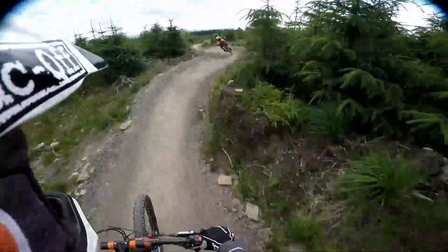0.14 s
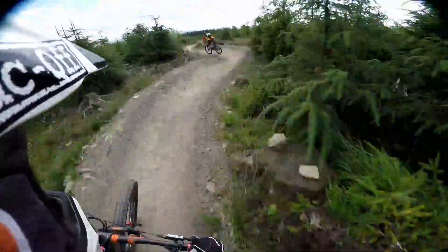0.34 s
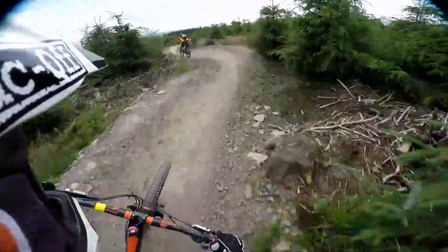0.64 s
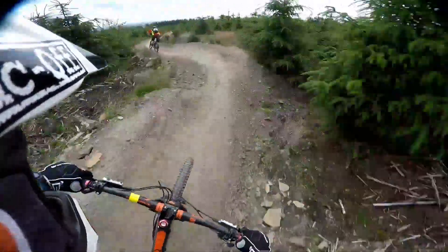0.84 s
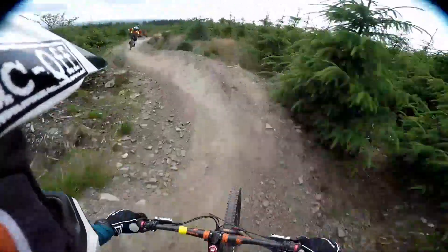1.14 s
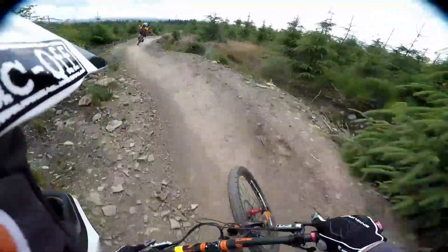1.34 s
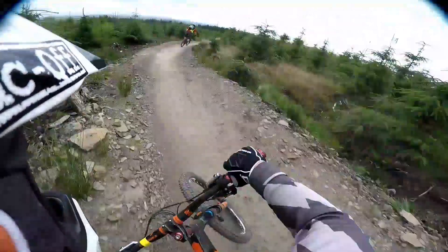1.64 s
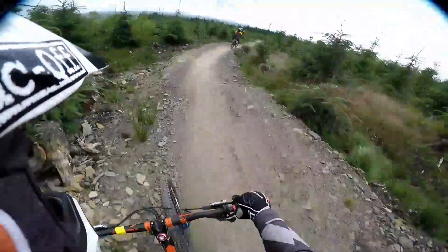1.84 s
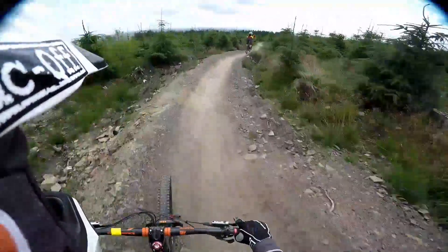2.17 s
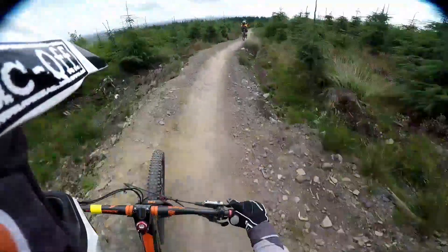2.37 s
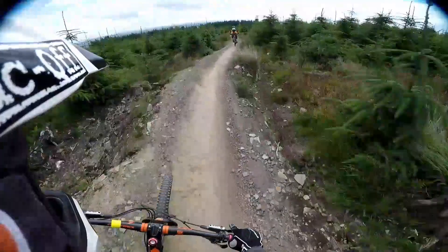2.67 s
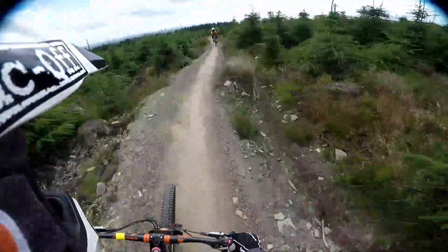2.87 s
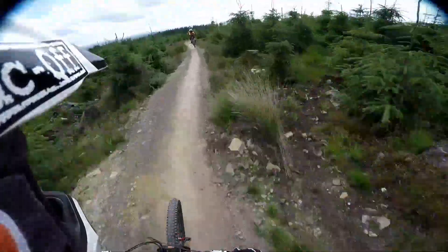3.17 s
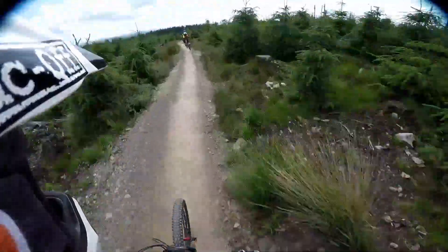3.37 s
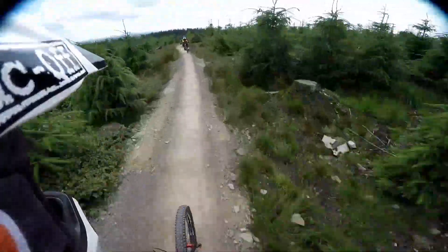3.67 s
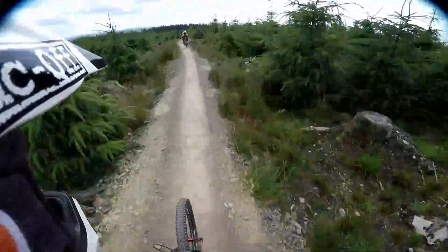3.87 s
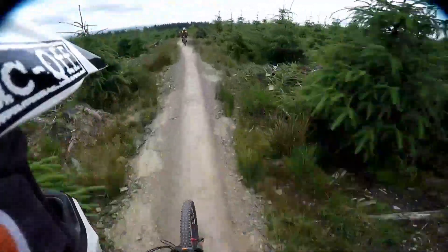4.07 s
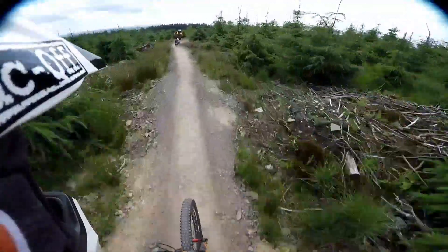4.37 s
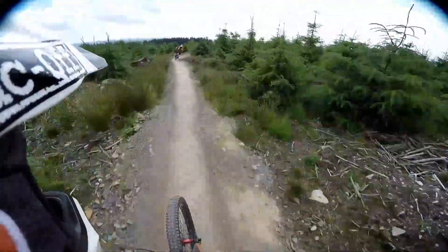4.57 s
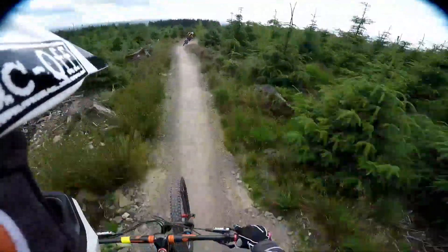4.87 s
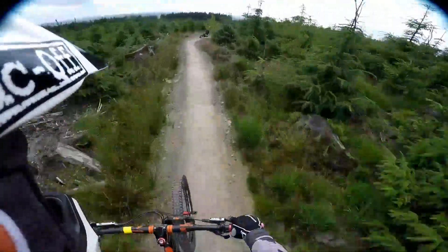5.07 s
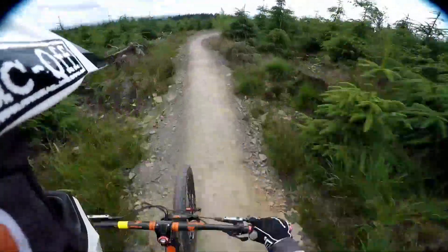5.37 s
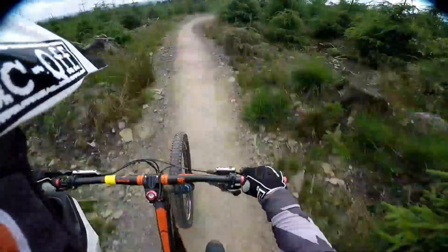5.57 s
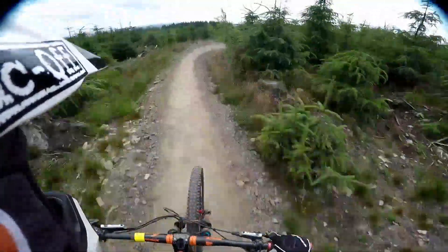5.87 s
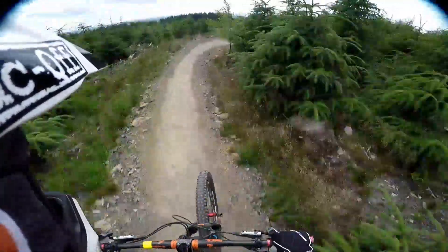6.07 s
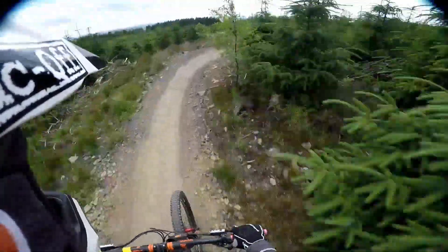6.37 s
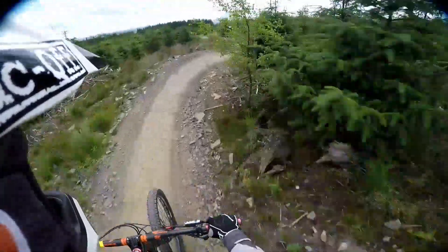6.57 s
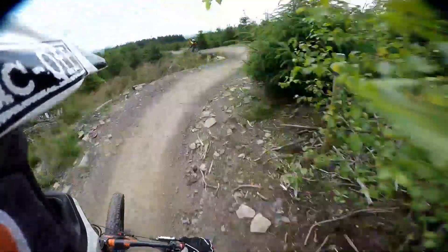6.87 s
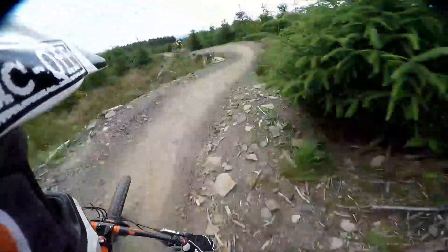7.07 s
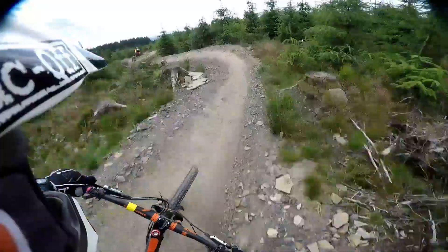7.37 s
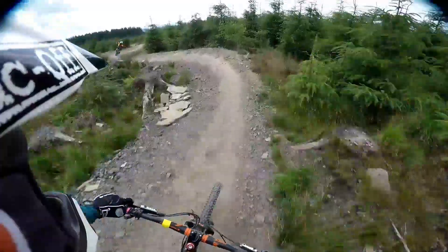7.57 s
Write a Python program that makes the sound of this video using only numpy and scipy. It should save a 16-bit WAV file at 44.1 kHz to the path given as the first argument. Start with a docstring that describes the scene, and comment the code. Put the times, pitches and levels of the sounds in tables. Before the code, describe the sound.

Wind buffets a helmet microphone as a mountain bike crunches fast down loose gravel, with stones pinging and rattling off the frame.

```python
"""A bicycle runs down a loose gravel trail, heard from a cased microphone on the rider's helmet.
Tyres: shared cracks and pitched grains in noise bands, and a hollow noise hum. Low thuds sag in pitch.
Stones ring decaying frame modes and rattle on; grit ticks as short noise bursts.
Wind on the case: shaped noise pushes and lumpy rush, thumps, one brightening gust, thin wandering howls."""
import sys
import numpy as np
from scipy import signal
from scipy.fft import rfft, irfft, next_fast_len
from scipy.io import wavfile
from scipy.ndimage import uniform_filter1d

SR = 44100
rng = np.random.default_rng(int(sys.argv[2]) if len(sys.argv) > 2 else 0)


def wav_out(sig):
    """Save sig, one row per channel (or a flat mono array), as 16-bit PCM at SR to the path in sys.argv[1]."""
    wavfile.write(sys.argv[1], SR, np.round(np.clip(np.atleast_2d(sig).T, -1, 1) * 32767).astype(np.int16))


N = 340893


def gain_of(db):
    """Decibels to amplitude gain."""
    return 10 ** (np.asarray(db) / 20)


def evened(x):
    """Scales to rms 1."""
    return x / np.sqrt(np.mean(x ** 2) + 1e-20)


def curve(rows, column):
    """One table column interpolated over time, for every sample."""
    rows = np.array(rows)
    return np.interp(np.arange(N) / SR, rows[:, 0], rows[:, column])


def add(mix, start_s, sound):
    """Mixes a sound in at a time, cut at the end of the mix."""
    part = mix[round(start_s * SR):][:len(sound)]
    part += sound[:len(part)]


def coloured(x, spectrum):
    """Filters a flat signal to a spectrum table, linear in dB over log frequency, at rms 1."""
    hz, db = np.transpose(spectrum)
    size = next_fast_len(len(x))
    log_bins = np.log(np.fft.rfftfreq(size, 1 / SR) + 1)
    bin_db = np.interp(log_bins, np.log(hz + 1), db, -120, -120)
    return evened(irfft(rfft(x, size) * gain_of(bin_db), size)[:len(x)])


def flutter(per_s):
    """Low-passed noise of rms 1 that changes about per_s times a second."""
    lowpass = signal.butter(2, per_s, fs=SR, output="sos")
    return evened(signal.sosfilt(lowpass, rng.standard_normal(N)))


def grain_gains(spread_db):
    """Random grain sizes: most small, a few large."""
    return gain_of(spread_db * np.minimum(rng.exponential(1, N), 4))


def grains(per_s, spread_db):
    """Sparse clicks of random sign and size, at rms 1."""
    sizes = grain_gains(spread_db)
    signs = rng.choice([-1., 1.], N)
    return evened(sizes * signs * (rng.random(N) < per_s / SR))


def stones(low_hz, high_hz, per_s, spread_db, cycles, count=16):
    """Shifting stones as decaying sines at random times; each falls 20 dB in the given cycles."""
    hits = grain_gains(spread_db) * (rng.random(N) < per_s / SR)
    kind = rng.integers(0, count, N)
    t = np.arange(1024) / SR
    out = np.zeros(N)
    for k, hz in enumerate(np.geomspace(low_hz, high_hz, count)):
        shape = np.sin(2 * np.pi * hz * t) * gain_of(-20 * hz * t / cycles)
        out += signal.oaconvolve(hits * (kind == k), shape)[:N]
    return evened(out)


# Tyres on packed ground. Each row: time in seconds, crunch, hiss and top-of-hiss base levels in dB.
PACKED_GROUND = [(0.05, -48, -58, -65), (0.2, -52, -59, -63.5), (0.6, -46.5, -54.5, -59.5),
                 (1.05, -47, -55, -59), (1.85, -48, -54, -57.5), (2.5, -49.5, -57, -61.5),
                 (2.9, -50, -58.5, -60.5), (3.5, -48.5, -56, -60), (4.3, -50, -58.5, -61),
                 (4.9, -54.5, -56, -62), (5.3, -56, -58.5, -61.5), (5.6, -49.5, -58.5, -62.5),
                 (6.15, -49.5, -56.5, -60.5), (6.9, -48, -54, -55.5), (7.69, -46.5, -54.5, -57)]
# Loose gravel. Each row: start in seconds, length in seconds, added crunch, hiss and top-of-hiss in dB,
# before the soft edges.
LOOSE_PATCHES = [(0.42, 0.1, 2, 2, 2.5), (0.6, 0.28, 2.5, 3, 4), (1.153, 0.25, 5.5, 0, -1.5),
                 (1.412, 0.29, 6, 2, 3.5), (2.017, 0.22, 3.5, 1.5, 0.5), (2.18, 0.3, 7.5, 4.5, 4),
                 (2.563, 0.097, 10, 1, 2), (3.667, 0.43, 1, -0.5, -1), (4.584, 0.26, 11.5, -0.5, 2.5),
                 (6.24, 0.52, 3, 0, -0.5), (6.995, .2, 3, 1, 2.5)]
PATCH_EDGE_S = 0.053


def ground_db(column):
    """Base level of one tyre layer: packed ground plus loose patches with tanh edges."""
    t, db = np.arange(N) / SR, curve(PACKED_GROUND, column)
    for start_s, length_s, *added_db in LOOSE_PATCHES:
        rise = np.tanh((t - start_s) / PATCH_EDGE_S)
        fall = np.tanh((t - start_s - length_s) / PATCH_EDGE_S)
        db = db + added_db[column - 1] * (rise - fall) / 2
    return db


# Tyre spectra: roar, case resonance, hiss, top of the hiss.
# Each row: frequency in Hz, relative density in dB per Hz.
ROAR_SPECTRUM = [(400, -39), (680, -4), (824, -6), (900, -0.5), (1280, 0), (1830, -3.5), (2200, -6.5),
                 (2860, -28), (4840, -120)]
CASE_SPECTRUM = [(1210, -45), (2050, -7), (2450, 0.5), (2760, 2.5), (3050, -3.5), (3500, -12), (4550, -16),
                 (7700, -120)]
HISS_SPECTRUM = [(1940, -9), (3300, -2), (4050, -0.5), (4880, 0.5), (6310, -2), (7310, -1.5), (9500, -27)]
HISS_TOP_SPECTRUM = [(6000, -24), (8000, -6), (12500, -9), (13900, -10), (15300, -13.5)]
CASE_DB, CASE_FOLLOWS, USUAL_CRUNCH_DB = -49, 0.79, -45  # CASE_DB holds at the usual crunch
LOW_STONE_CYCLES, HIGH_STONE_CYCLES = 2.9, 8
CRACKS_IN_ROAR, CRACKS_IN_CASE, CRACKS_IN_HISS = 0.29, 0.43, 0.27


def tyres():
    """Stones pop and crack inside smooth noise; all bands share the same bumps and cracks."""
    bumps, cracks = flutter(33.0), grains(320.0, 7.5)
    crunch_db = ground_db(1)
    case_db = CASE_DB + CASE_FOLLOWS * (crunch_db - USUAL_CRUNCH_DB)
    low_pops = stones(604.0, 2480.0, 600., 3.3, LOW_STONE_CYCLES) + CRACKS_IN_ROAR * cracks
    high_pops = stones(2230.0, 3460.0, 600., 3.3, HIGH_STONE_CYCLES) + CRACKS_IN_CASE * cracks
    # spectrum, base dB, pops, share of pops, bump depth dB
    layers = [(ROAR_SPECTRUM, crunch_db, low_pops, .65, 1.2),
              (CASE_SPECTRUM, case_db, high_pops, .55, 1.1),
              (HISS_SPECTRUM, ground_db(2), cracks, CRACKS_IN_HISS, .8),
              (HISS_TOP_SPECTRUM, ground_db(3), cracks, CRACKS_IN_HISS, .7)]
    out = np.zeros(N)
    for spectrum, db, pops, share, bump_db in layers:
        smooth = np.sqrt(1 - share ** 2) * coloured(rng.standard_normal(N), spectrum)
        rough = share * coloured(pops, spectrum)
        out += gain_of(db + bump_db * bumps) * (smooth + rough)
    return out


# Hollow hum of the tyres. Each row: time in seconds, level in dB.
HUM_LEVEL = [(0.1, -60), (0.25, -39.5), (0.6, -48), (0.77, -28.5), (0.9, -40), (1.02, -32.5), (1.28, -37),
             (1.45, -37), (1.65, -33), (1.95, -44), (2.4, -38), (2.6, -54), (3.3, -37), (3.6, -58)]
# Hum resonance. Each row: frequency in Hz, relative density in dB per Hz.
HUM_SPECTRUM = [(180, -50), (232, -4.5), (252, 4.5), (272, -4.5), (340, -36)]


def hum():
    """Noise in one narrow low resonance."""
    return gain_of(curve(HUM_LEVEL, 1)) * coloured(rng.standard_normal(N), HUM_SPECTRUM)


# Stones on the frame. Each row: start in seconds, peak of the first hit in dB, centre of the blow in Hz,
# spread in octaves.
STONE_KNOCKS = [(0.364, -34, 1500, 0.32), (0.4164, -27, 1600, 0.56), (.438, -41, 2180, 0.79),
                (.49, -28.5, 1500, .4), (0.618, -30.5, 2150, 0.18), (0.639, -32, 1200, .6),
                (.724, -36, 2500, 0.35), (.746, -31, 2600, 0.36), (.795, -32, 1200, 0.31),
                (0.85, -24, 1480, 0.64), (0.916, -28, 1170, 0.7), (0.95, -29, 1930, 0.66),
                (0.989, -29, 1700, .6), (1.043, -40, 2300, .4), (1.12, -22.5, 1520, 0.15),
                (1.21, -27, 1830, 0.62), (1.2461, -14, 1450, 0.34), (1.252, -34, 2600, 0.6),
                (1.256, -17, 1660, 0.5), (1.2576, -14, 1880, 0.5), (1.2595, -35, 2800, 0.22),
                (1.2623, -33, 2800, .2), (1.265, -18, 1450, 0.54), (1.275, -37, 2200, .65),
                (1.2915, -27, 1250, 0.4), (1.296, -31, 2500, 0.82), (1.3006, -25, 2190, 0.7),
                (1.309, -33, 2200, 0.65), (1.306, -35, 2700, 0.51), (1.3315, -32, 3580, 0.61),
                (1.332, -22.5, 1150, 0.43), (2.024, -32, 2800, 0.33), (2.033, -27.5, 1500, 0.6),
                (2.066, -32, 1700, .5), (1.398, -29, 1500, .7), (1.526, -34, 2680, 0.24),
                (1.623, -33.5, 2500, 0.091), (1.7, -32.5, 2730, 0.18), (2.075, -27, 1790, 0.96),
                (2.0972, -29.5, 1500, 0.73), (2.116, -31, 2500, .4), (2.124, -33, 1100, 0.54),
                (2.184, -29, 1070, 0.64), (2.197, -26, 1200, 0.62), (2.236, -26.5, 1100, 0.71),
                (2.252, -35, 2600, 0.44), (2.264, -29, 1400, 0.57), (2.273, -33, 2800, .3),
                (2.285, -30, 1500, .5), (2.304, -31, 1000, 0.51), (2.312, -35, 2200, 0.43),
                (2.345, -35, 1400, 0.27), (2.372, -35, 1100, 0.49), (2.395, -26, 1560, 0.73),
                (2.402, -25, 1250, .3), (2.417, -30, 960, 0.35), (2.431, -35, 2400, 0.33),
                (2.449, -30, 1600, .3), (2.457, -31, 1250, 0.31), (2.492, -30, 2230, .4),
                (2.531, -36, 1500, 0.28), (2.551, -29, 1500, 0.5), (2.559, -31, 1700, 0.16),
                (2.634, -34, 1600, .6), (2.658, -26.5, 1690, 0.2), (3.354, -43, 2600, 0.27),
                (3.3612, -37, 1550, 0.38), (3.3612, -24, 540, 0.53), (3.368, -38, 1700, 0.27),
                (3.384, -37, 2700, .4), (3.405, -26, 1550, .4), (4.9665, -44, 2200, .3),
                (4.9681, -21.5, 850, 0.47), (5.068, -38.5, 2600, 0.33), (5.139, -39, 1250, .35),
                (5.141, -31.5, 760, 0.42), (5.344, -30, 1700, 0.77), (5.372, -32, 2800, 0.34),
                (5.394, -23, 1920, .3), (5.457, -32, 2500, .3), (5.478, -29, 1500, .5),
                (5.693, -26.5, 2320, 0.5), (5.787, -27, 2000, 0.51), (6.0124, -30, 1500, 0.42),
                (6.0133, -24.5, 780, 0.41), (6.129, -30, 1550, 0.89), (6.297, -37, 2800, .3),
                (6.304, -32, 2300, 0.18), (6.367, -37, 2600, .3), (6.372, -30, 1920, 0.62),
                (6.377, -27, 2000, 0.51), (6.382, -30, 2400, .6), (6.407, -40, 1900, .5),
                (6.448, -31, 2200, 0.46), (6.455, -33, 2800, 0.33), (6.523, -33, 700, 0.37),
                (6.542, -30, 1300, 0.54), (6.548, -33, 1200, 0.13), (6.575, -27, 1600, .5),
                (6.582, -31, 1300, .3), (6.593, -30, 1700, 0.54), (6.621, -33, 2300, .4),
                (6.642, -27, 1890, 0.46), (6.658, -32, 1200, 0.43), (6.67, -27, 1480, .4),
                (6.705, -35, 1300, .3), (6.765, -32, 1300, 0.36), (6.786, -25, 1490, 0.24),
                (6.789, -27, 1440, .3), (6.809, -39, 2800, .1)]
# Frame modes. Each row: frequency in Hz, relative level in dB, share of the ring time.
FRAME_MODES = [(470, 8, 1.0), (570, 4.5, 1), (625, 10, 1), (780, 1, 0.63), (923, 4.5, 0.71),
               (1170, 6.5, 0.36), (1317, 8.5, 0.29), (1613, 1.5, 0.6), (1822, -1.5, 0.51), (2096, 2, 0.46),
               (2477, 2, 0.53), (2824, 3.5, 0.58), (3114, -3.5, 0.66), (3900, 0.5, 0.35), (4900, 2, 0.39)]
RING_S = 0.033  # 60 dB decay at usual width and full share
BLOW_DB, BLOW_CYCLES = -4.5, 2.16  # greatest level against the ring, pulse length
SOFT_MODE_HZ, SOFT_RISE_S, HARD_RISE_S = 640, .0024, .0004  # low modes swell more slowly
USUAL_OCTAVES, CLICK_HZ = .5, 1500  # narrower or lower blows click less
SPOT_DB = 3  # random range of each mode level, as stones land on different spots
RATTLE_S, RATTLE_DB, RATTLE_FADE_DB = .012, -12, -2  # three rebounds within RATTLE_S


def knocks():
    """A pulse excites frame modes near its centre, high modes swelling first; small rebounds follow."""
    out, t = np.zeros(N), np.arange(4000) / SR
    hz, mode_db, share = np.transpose(FRAME_MODES)[:, :, None]
    modes = len(FRAME_MODES)
    rise_s = np.maximum(SOFT_RISE_S * (SOFT_MODE_HZ / hz) ** 2, HARD_RISE_S)
    swell = 1 - np.exp(-(t / rise_s) ** 2)
    draws = rng.random((len(STONE_KNOCKS), 2 * modes + 3))
    for (start_s, db, centre_hz, octaves), draw in zip(STONE_KNOCKS, draws):
        turn, spot, later = np.split(draw[:, None], [modes, 2 * modes])
        octaves = max(octaves, .1)
        width = octaves / USUAL_OCTAVES
        reach_db = -2.2 * (np.log2(hz / centre_hz) / octaves) ** 2 + SPOT_DB * (spot - .5)
        decay_db = -60 * t * width ** .5 / (RING_S * share)  # narrow blows ring longer
        tones = np.sin(2 * np.pi * (hz * t + 0.44 * turn))
        ring = (gain_of(mode_db + reach_db + decay_db) * tones * swell).sum(0)
        cycles = centre_hz * t
        blow = np.sin(2 * np.pi * cycles) * np.sin(np.pi * np.minimum(cycles / BLOW_CYCLES, 1)) ** 2
        click = gain_of(BLOW_DB) * min(width, 1) * min(centre_hz / CLICK_HZ, 1) ** 2
        sound = ring / abs(ring).max() + click * blow
        sound = gain_of(db) * sound / abs(sound).max()
        add(out, start_s, sound)
        for u in later[:, 0]:
            add(out, start_s + RATTLE_S * u, -gain_of(RATTLE_DB + RATTLE_FADE_DB * u) * sound)
    return out


# Grit on hard parts. Each row: start in seconds, nominal peak in dB (twice the rms before decay), centre in Hz.
GRIT_TICKS = [(0.2194, -42, 3000), (0.493, -32.5, 4200), (0.803, -34, 5200), (1.0093, -40, 6200),
              (1.25, -34, 3600), (1.267, -37, 3100), (1.33, -40, 3400), (2.022, -37, 3000),
              (2.026, -32.5, 4240), (2.217, -38, 4200), (2.252, -35, 4500), (2.2737, -33, 3300),
              (2.289, -39, 4500), (2.394, -35, 4600), (2.492, -29.5, 3900), (3.4047, -40, 3400),
              (3.5185, -31, 3900), (4.47, -39, 5000), (4.553, -37, 4600), (4.632, -30, 5330),
              (5.1507, -44, 4900), (5.45, -34.5, 8000), (5.476, -33, 4900), (5.5423, -45, 4700),
              (5.691, -27.5, 4150), (5.863, -39.5, 4160), (6.227, -38, 4480), (6.371, -44, 4500),
              (6.3814, -45, 3800), (6.45, -47, 2900), (6.621, -39, 4000)]
TICK_S = 0.04  # 60 dB decay
TICK_OCTAVES, WIDER_PER_DB, USUAL_TICK_DB, SKIRT_DB = .45, .025, -36, 14  # harder ticks spread wider


def ticks():
    """Sharp snaps: band-shaped noise under a fast exponential decay."""
    out, t = np.zeros(N), np.arange(2048) / SR
    noise = rng.standard_normal((len(GRIT_TICKS), 2048))
    steps = np.arange(-5, 6)
    skirt_db = -np.minimum(4.5 * abs(steps) ** 1.9, SKIRT_DB + abs(steps))
    for (start_s, db, centre_hz), snap in zip(GRIT_TICKS, noise):
        octaves = max(TICK_OCTAVES + WIDER_PER_DB * (db - USUAL_TICK_DB), .2)
        band = np.transpose([centre_hz * 2. ** (steps * octaves), skirt_db])
        add(out, start_s, gain_of(db - 60 * t / TICK_S) * coloured(snap, band) / 2)
    return out


# Low thuds, from tyres or wind. Each row: start in seconds, peak in dB, start and end pitch in Hz,
# length in seconds.
LOW_THUDS = [(2.54, -23.5, 197.6, 140, 0.084), (3.101, -10.5, 61.6, 36, 0.041),
             (4.26, -15, 183.3, 150, 0.085)]


def thuds():
    """Soft low sines that sag in pitch under a raised-cosine swell."""
    out = np.zeros(N)
    for start_s, db, start_hz, end_hz, length_s in LOW_THUDS:
        hz = np.linspace(start_hz, end_hz, round(length_s * SR))
        tone = np.sin(2 * np.pi * np.cumsum(hz) / SR)
        add(out, start_s, gain_of(db) * np.hanning(len(hz)) * tone)
    return out


# Hard thumps of wind. Each row: time of the crest in seconds, rise of the slow pushes in dB.
WIND_THUMPS = [(0.46, 4), (0.95, 8.5), (1.26, 4.5), (1.76, 13.5), (2.33, 11), (4.99, 13.5), (3.49, 4),
               (4.33, 4.5), (4.541, 1), (5.86, 6), (6.36, 7), (6.589, 9), (6.85, 6), (7.211, 7.5)]
THUMP_RISE_S, THUMP_FALL_S = 0.0045, 0.0089


def thumps_db():
    """Extra wind strength: each thump rises fast and falls a little slower."""
    t, out = np.arange(N) / SR, np.zeros(N)
    for crest_s, db in WIND_THUMPS:
        side_s = np.where(t < crest_s, THUMP_RISE_S, THUMP_FALL_S)
        out += db * np.exp(-((t - crest_s) / side_s) ** 2)
    return out


# Wind on the case. Each row: time in seconds, base levels in dB of slow pushes, low, middle and upper rush.
WIND_LEVELS = [(0.05, -15, -21, -22, -24)]
WIND_LEVELS += [
    (0.1, -17, -28, -25, -28), (0.14, -17, -28, -30, -37), (0.22, -27, -32, -33, -35),
    (0.29, -14, -27, -28, -34), (0.37, -20, -21, -30, -34), (0.73, -20, -30, -30, -33),
    (0.79, -21, -23, -27, -32), (0.92, -21, -34, -40, -35), (0.96, -14, -21, -30, -35),
    (1.07, -22, -32, -30, -38), (1.22, -27, -26, -33, -35), (1.26, -18, -27, -24, -25),
    (1.36, -25, -29, -32, -34), (1.45, -19, -23, -28, -30), (1.53, -31, -39, -40, -28),
    (1.6, -25, -29, -28, -30), (1.83, -16, -22, -29, -34), (2.02, -23, -31, -36, -38),
    (2.4, -26, -29, -31, -31), (2.53, -30, -39, -35, -36), (3.07, -30, -36, -38, -39),
    (3.14, -14, -22, -30, -35), (3.18, -27, -30, -38, -40), (3.27, -27, -40, -34, -38),
    (3.44, -20, -19, -30, -32), (3.54, -23, -31, -35, -40), (3.73, -26, -32, -36, -35),
    (4.24, -20, -24, -31, -35), (4.3, -21, -20, -18, -31), (4.34, -12, -26, -28, -32),
    (4.41, -27, -27, -32, -36), (4.53, -13, -25, -29, -29), (4.66, -22, -29, -27, -31),
    (4.81, -21, -25, -33, -31), (4.85, -20, -38, -34, -33), (4.93, -23, -30, -36, -43),
    (4.98, -25, -32, -28, -28), (5.0, -18, -23, -26, -37), (5.19, -21, -29, -35, -42),
    (5.34, -11, -19, -22, -24), (5.5, -14, -22, -21, -24), (5.55, -22, -34, -34, -31),
    (5.61, -32, -36, -41, -38), (5.8, -15, -24, -24, -32), (5.93, -22, -25, -30, -33),
    (6.01, -20, -25, -25, -28), (6.12, -22, -26, -32, -38), (6.54, -16, -22, -22, -26),
    (6.62, -16, -23, -31, -32), (6.88, -19, -23, -26, -30), (7.21, -13, -22, -27, -26),
    (7.34, -18, -30, -24, -29), (7.38, -18, -26, -27, -30), (7.68, -15, -24, -27, -29)]
# Wind spectra: pushes, low, middle and upper rush. Each row: frequency in Hz, relative density in dB per Hz.
PUSH_SPECTRUM = [(7.1, -126), (12, 0.5), (43, 9), (70, 1), (110, -19.5), (170, -65), (290, -120)]
RUSH_SPECTRUM = [(45, -22), (75, 6.5), (140, -3), (190, -26), (400, -78), (730, -120)]
RUSH_MIDDLE_SPECTRUM = [(70, -40), (120, -13.5), (160, 2.5), (270, -2), (340, -23), (730, -93)]
RUSH_TOP_SPECTRUM = [(160, -46), (250, -16), (310, 0.5), (467, -1.5), (750, -23.5), (980, -32),
                     (1650, -120)]
LUMP_DB, LUMPS_PER_S = 2, 14
RUSH_LUMP_DB, RUSH_LUMPS_PER_S = 1, 12.3
THUMP_IN_RUSH, TOP_FOLLOWS = 0.11, 0.66  # thump share in the low rush; share of its lumps higher up


def wind():
    """Eddies break on the case: slow pushes, and a rush that comes in lumps."""
    push = coloured(rng.standard_normal(N), PUSH_SPECTRUM)
    # partly levels successive pushes
    push = evened(push / (uniform_filter1d(push ** 2, size=1800) + .1) ** .33)
    eddies = rng.standard_normal(N) * gain_of(1.64 * flutter(23.5))
    hard_db = thumps_db()
    pushes = gain_of(curve(WIND_LEVELS, 1) + hard_db + LUMP_DB * flutter(LUMPS_PER_S)) * push
    lump_db = THUMP_IN_RUSH * hard_db + RUSH_LUMP_DB * flutter(RUSH_LUMPS_PER_S)
    low = gain_of(curve(WIND_LEVELS, 2) + lump_db) * coloured(eddies, RUSH_SPECTRUM)
    middle = gain_of(curve(WIND_LEVELS, 3)) * coloured(eddies, RUSH_MIDDLE_SPECTRUM)
    upper = gain_of(curve(WIND_LEVELS, 4)) * coloured(eddies, RUSH_TOP_SPECTRUM)
    return pushes + low + gain_of(TOP_FOLLOWS * lump_db) * (middle + upper)


# Hard gust. Each row: time in seconds, relative level in dB, upper edge in Hz.
GUST_PATH = [(5.29, -64, 2000), (5.35, -44.5, 2530), (5.4, -38, 3200), (5.45, -36.5, 5200),
             (5.48, -41.5, 3900), (5.55, -45, 2500)]


def gust():
    """Gritty noise above 600 Hz; level and upper edge each follow the table, brightest near the crest."""
    grit = rng.standard_normal(N) * gain_of(1.2 * flutter(60.0)) + 0.52 * grains(900.0, 3.8)
    hz, t, bins = signal.stft(evened(grit), SR, nperseg=256)
    path_s, db, top_hz = np.transpose(GUST_PATH)
    edge = 1 / (1 + (hz[:, None] / np.interp(t, path_s, top_hz)) ** 3.4) * (hz[:, None] > 600)
    edge = edge / np.sqrt(np.mean(edge ** 2, 0))  # the edge leaves the level alone
    level = gain_of(np.interp(t, path_s, db, -120, -120))
    return signal.istft(bins * edge * level, SR, nperseg=256)[1][:N]


# Faint narrow howls. Each row: start in seconds, length in seconds, base level in dB, mean pitch in Hz.
FAINT_HOWLS = [(2.52, 0.25, -47.5, 910), (3.747, 0.22, -47.5, 929), (6.192, 0.16, -43, 891)]
HOWL_WANDER, HOWL_WANDERS_PER_S, HOWL_ROUGH_DB = 0.012, 20.0, 4.5  # wander: rms share of the pitch


def howls():
    """Thin, rough sines whose pitch wanders, swelling and fading."""
    out = np.zeros(N)
    wander, rough = flutter(HOWL_WANDERS_PER_S), flutter(70.0)
    for start_s, length_s, db, hz in FAINT_HOWLS:
        part = slice(round(start_s * SR), round((start_s + length_s) * SR))
        tone = np.sin(2 * np.pi * np.cumsum(hz * (1 + HOWL_WANDER * wander[part])) / SR)
        swell = np.hanning(len(tone)) ** 0.58
        add(out, start_s, gain_of(db + HOWL_ROUGH_DB * rough[part]) * swell * tone)
    return out


def scene():
    """All sources sum at one microphone, in open air."""
    bicycle = tyres() + hum() + knocks() + ticks()
    air = wind() + gust() + howls()
    return (bicycle + thuds() + air)[None]


EDGE_HZ = 15350


def record(dry):
    """Soft overload on the strongest peaks, then a low-pass band limit."""
    ceiling = .95
    soft = dry / (1 + abs(dry / ceiling) ** 4) ** .25
    lowpass = signal.firwin(1023, EDGE_HZ, window=("kaiser", 9), fs=SR)
    return signal.oaconvolve(soft, lowpass[None], "same")


dry = scene()
out = record(dry)
wav_out(out)
```